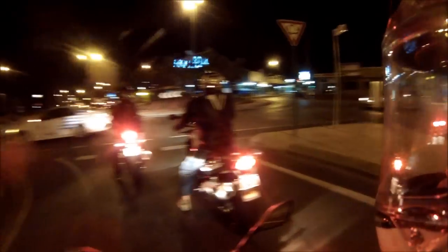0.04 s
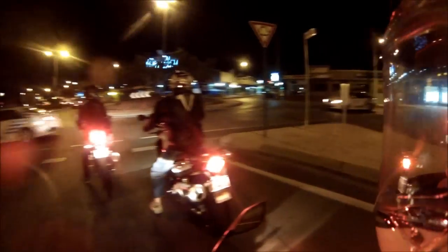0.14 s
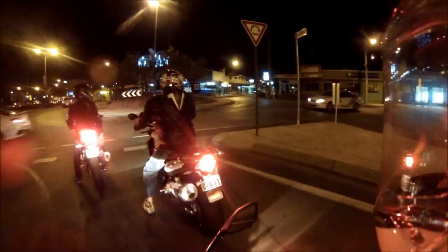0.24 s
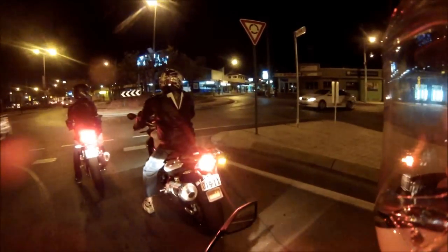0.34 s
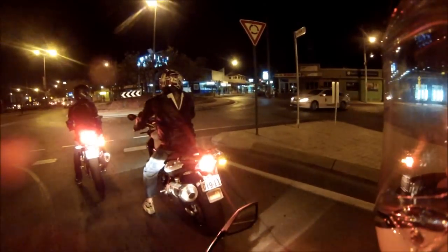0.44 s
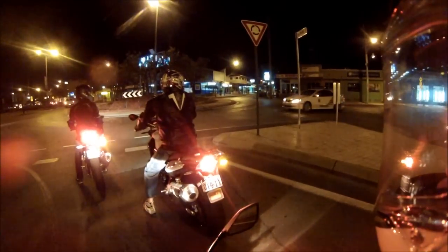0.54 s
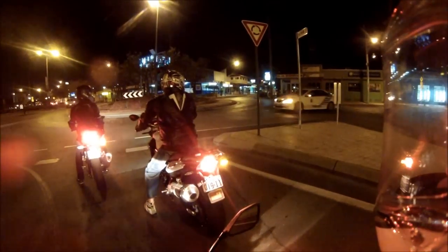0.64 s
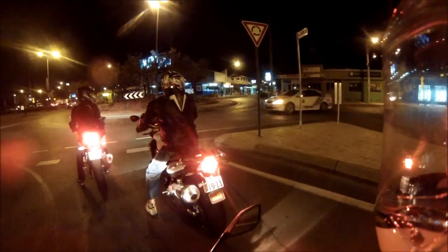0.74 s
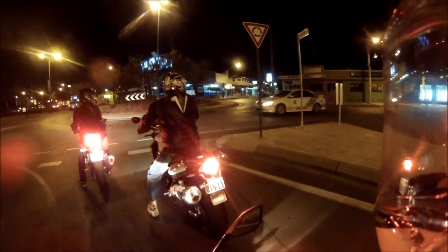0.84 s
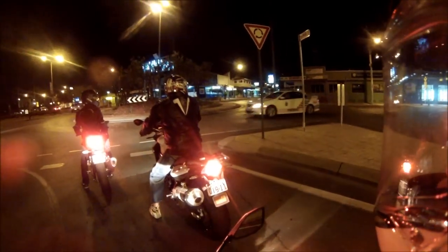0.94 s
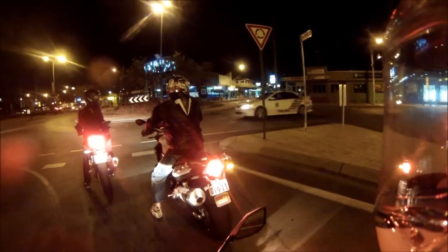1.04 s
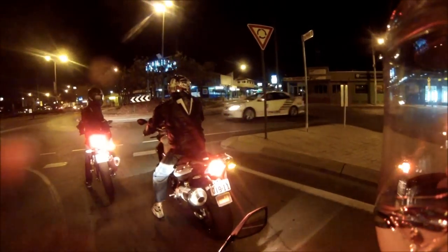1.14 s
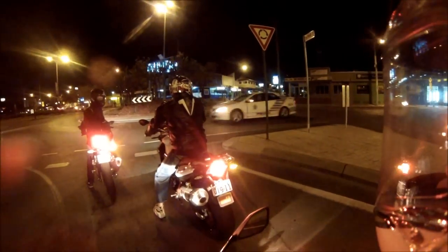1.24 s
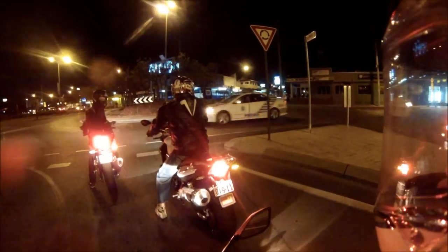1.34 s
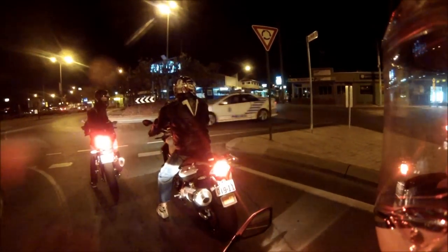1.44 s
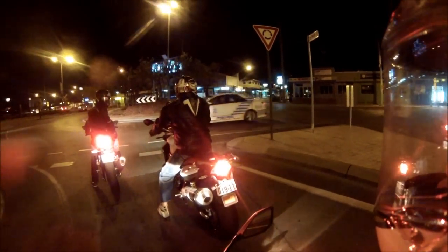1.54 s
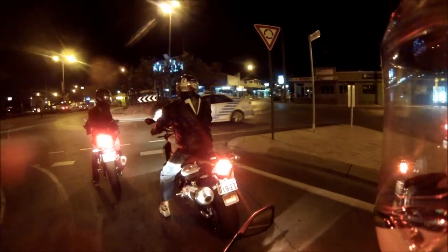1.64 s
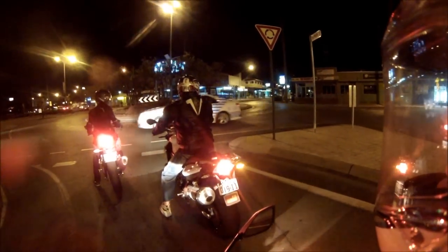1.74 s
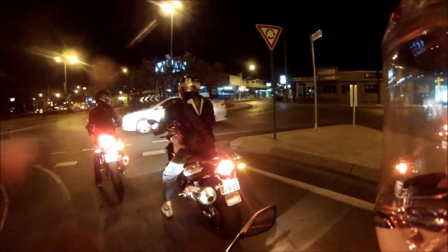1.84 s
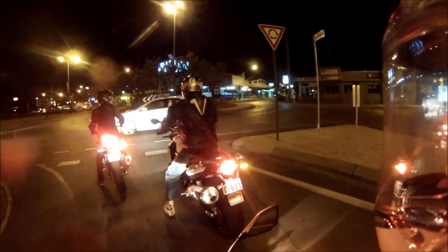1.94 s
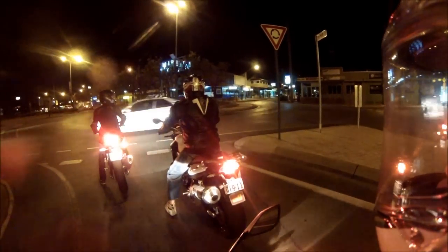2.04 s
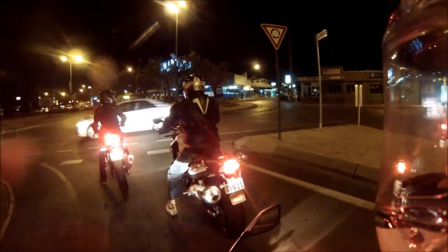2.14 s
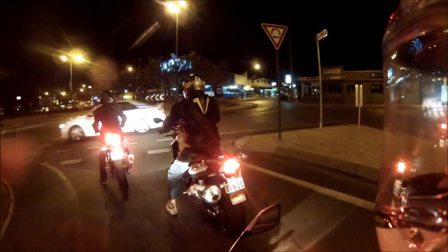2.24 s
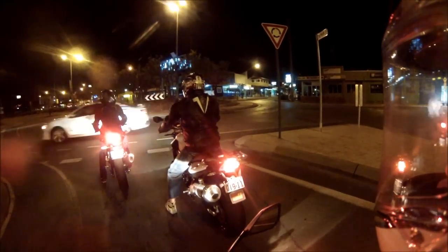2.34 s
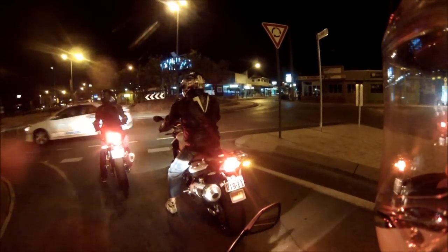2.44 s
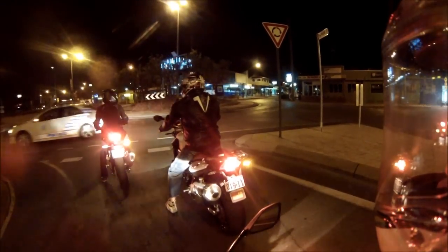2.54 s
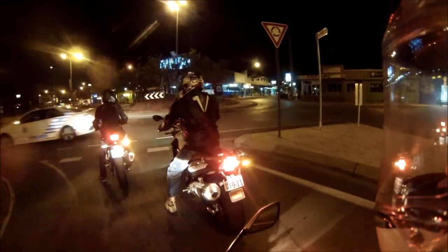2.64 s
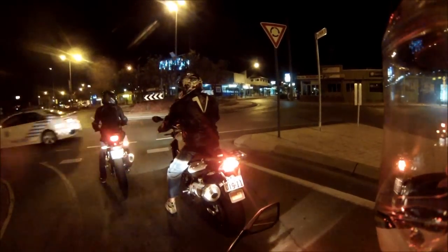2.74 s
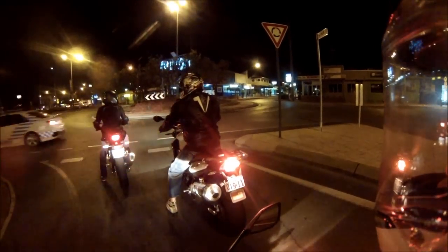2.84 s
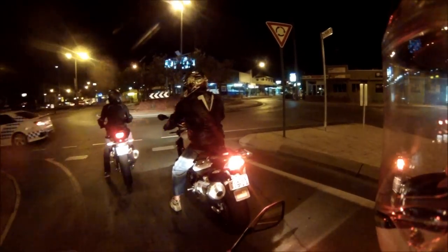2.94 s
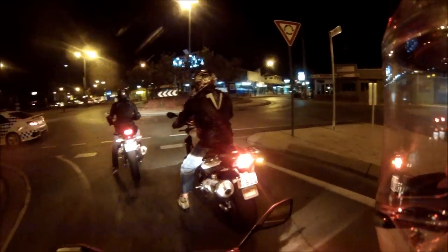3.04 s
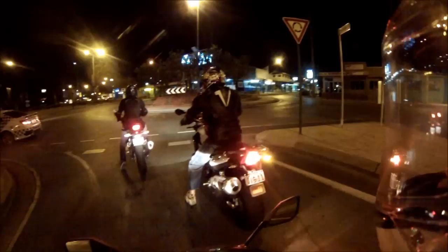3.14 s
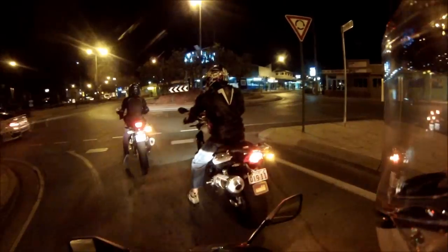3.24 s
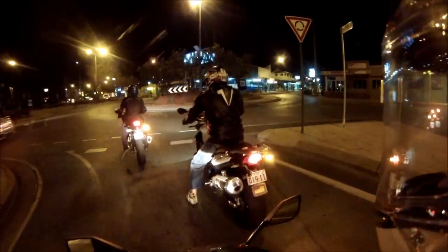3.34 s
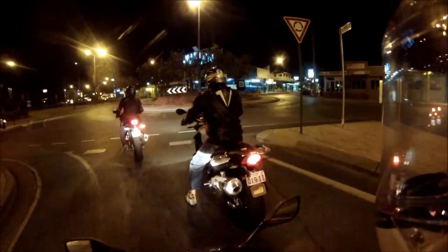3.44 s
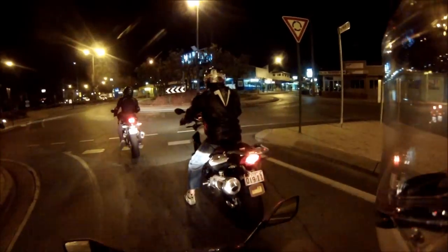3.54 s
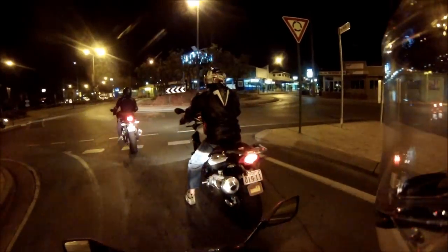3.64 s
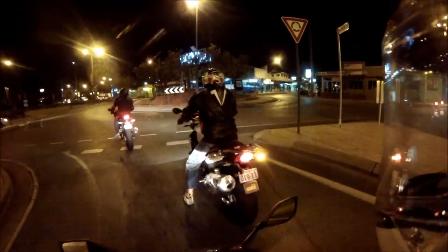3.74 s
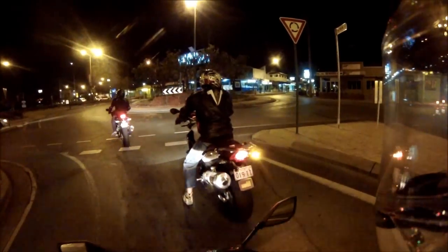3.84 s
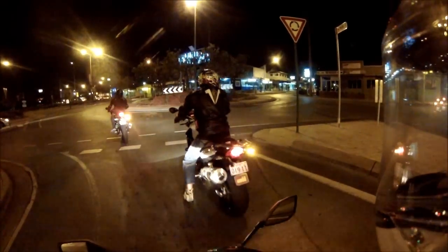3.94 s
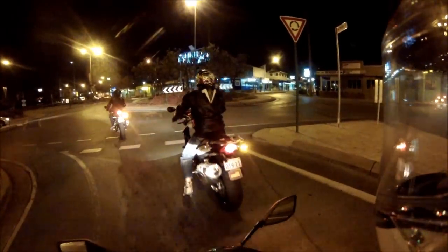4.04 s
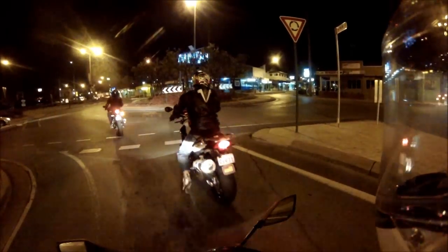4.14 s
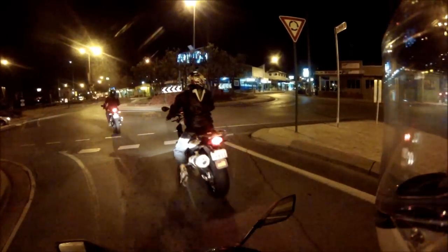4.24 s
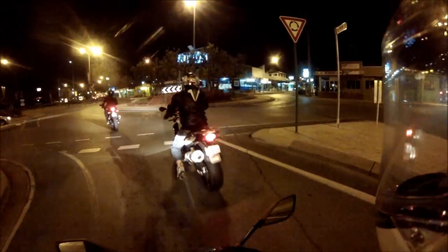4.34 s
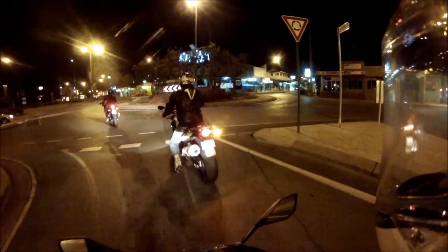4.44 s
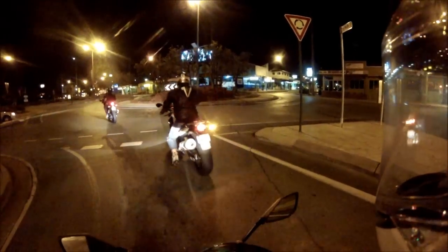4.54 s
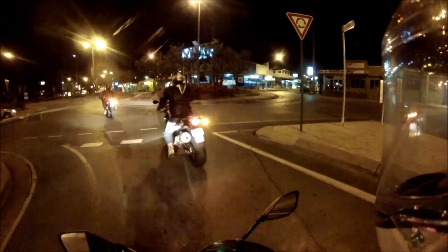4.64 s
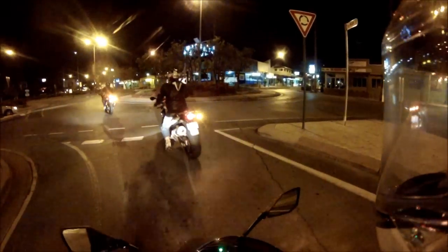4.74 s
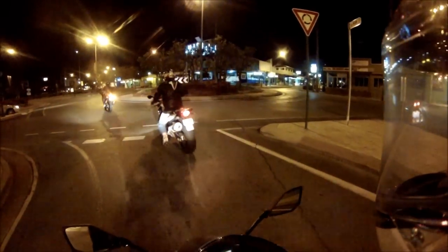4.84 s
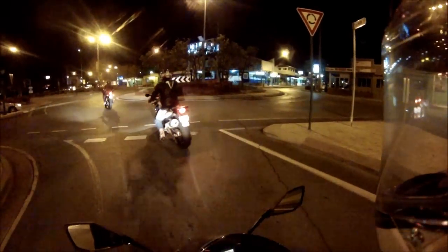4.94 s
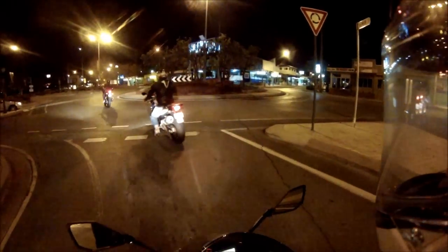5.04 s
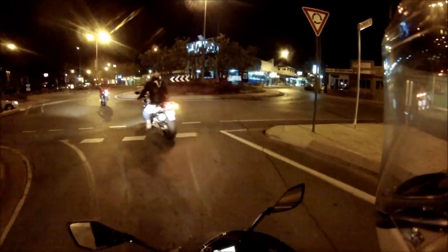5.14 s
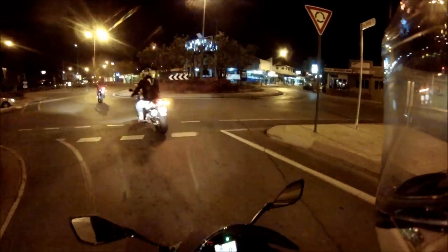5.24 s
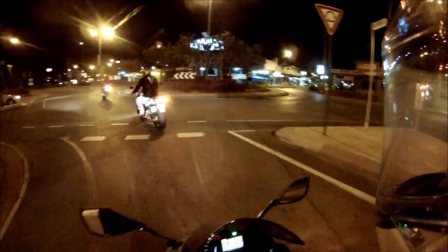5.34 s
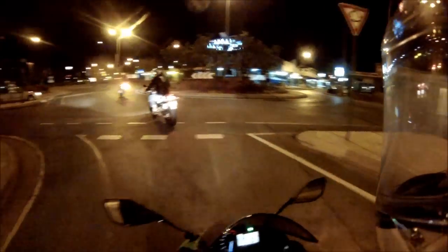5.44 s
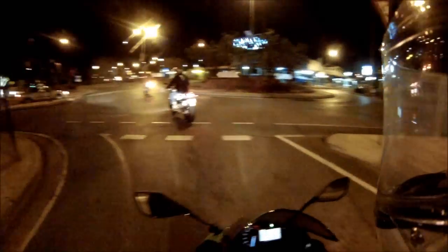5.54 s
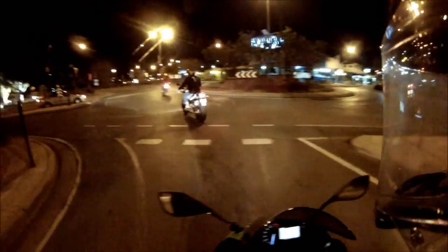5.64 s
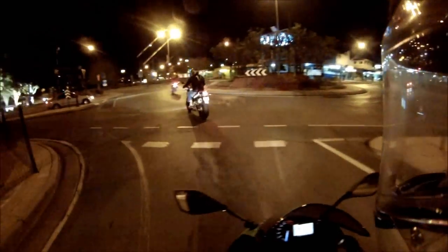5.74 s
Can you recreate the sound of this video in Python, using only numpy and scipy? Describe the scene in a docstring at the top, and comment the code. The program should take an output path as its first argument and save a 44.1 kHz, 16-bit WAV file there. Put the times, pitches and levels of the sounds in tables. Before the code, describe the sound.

A motorcycle thuds at idle right below the microphone, while a four-cylinder bike a few metres ahead idles with quick, dry squeaks. About halfway through, the squeaking stops and the bike ahead revs and leaves with a rasping exhaust. A second later the near bike pulls away, exhaust barking and gears whining. Wind rumbles on the microphone over the faint hush of night streets, with a few light knocks.

```python
"""A roundabout at night, the microphone at the rider's seat of the rearmost waiting motorcycle.
At first its engine thuds at idle, over distant streets and air rumbling on the microphone, while a
four-cylinder bike some three metres ahead squeaks once a cycle. Near 3 s that bike revs, and at 3.5 s
it leaves, its exhaust rasping as it draws away. About a second later a faint whine passes up the
road and the near bike pulls away, its exhaust barking and its gears whining under load."""
import sys
import numpy as np
from scipy import signal
from scipy.fft import rfft, irfft
from scipy.io import wavfile
from scipy.ndimage import uniform_filter1d

SR = 44100
rng = np.random.default_rng(int(sys.argv[2]) if len(sys.argv) > 2 else 0)


def int16_out(signal):
    """Quantize to a 16-bit WAV file."""
    q = np.round(np.clip(np.atleast_2d(signal).T, -1, 1) * 32767)
    wavfile.write(sys.argv[1], SR, q.astype(np.int16))


N = 254898
TIME = np.arange(N) / SR

# Distant streets, and air on the microphone. Each row: frequency in Hz, relative level in dB.
STREET_SPECTRUM = [(50, 3.5), (300, 1), (500, -2), (800, -19.5), (3000, -31), (8000, -35), (12000, -30),
                   (15000, -63)]
WIND_SPECTRUM = [(10, -23), (24, -17), (34, -1), (50, -5.5), (65, -7), (95, -9.5), (125, -18), (200, -13.5),
                 (400, -39), (1000, -67.5)]
# Gusts. Each row: centre in seconds, dB over the calm, half length in seconds.
GUSTS = [(0.123, 4, 0.19), (3.9, 3.5, 1), (5.597, 6, 0.085)]
# Light metal knocks; soft bumps on the mount. Each row: start in seconds, dB before trim, pitch in Hz.
METAL_KNOCKS = [(0.5352, -52, 1840), (3.0043, -47, 1880), (3.0834, -47.5, 1850), (3.5088, -47, 1900)]
MOUNT_BUMPS = [(.055, -28, 44.5), (2.89, -35, 100), (5.27, -23.5, 57.45)]

# The bike ahead idles, revs, then pulls steadily. Each row: time in seconds, firing rate in Hz.
AHEAD_FIRING_RATE = [(0, 41.68), (1.3, 40.43), (1.7, 40.98), (1.95, 38.85), (2.85, 41.1), (3.0, 45.65),
                     (3.35, 46.44), (3.52, 49.5), (3.61, 52.8), (3.7, 54.32), (3.84, 52.7), (4.08, 48.27),
                     (4.37, 43.25), (4.95, 47.46), (5.78, 44.14)]
# Its throttle. Each row: time in seconds, opening from 0 to 1.
AHEAD_THROTTLE = [(2.5, 0), (2.98, 0.46), (3.3, 0.49), (3.5, 0.88), (3.7, 0.96), (4.0, .95), (4.4, 0.94),
                  (4.9, .97), (5.78, 0.85)]
# Its exhaust boom, pipe rasp and gas hiss. Each row: frequency in Hz, relative level in dB.
AHEAD_BOOM_SPECTRUM = [(25, -20), (40, -5), (52, 4), (85, 2), (115, -15.5), (160, -36), (270, -22),
                       (900, -60)]
AHEAD_RASP_SPECTRUM = [(70, -14), (110, -7), (152, 14.5), (210, -7), (330, -8.5), (420, 0), (490, 4.5),
                       (545, -2), (625, -11), (730, -6), (900, -23), (1250, -10.5), (1900, -16),
                       (4000, -45.5)]
AHEAD_HISS_SPECTRUM = [(500, -8.5), (950, -9.5), (1400, 3.5), (2000, -1.5), (2800, -7.5), (3600, -2),
                       (4250, -12.5), (4800, -3.5), (5800, -12.5), (6700, -8), (7600, -12), (9300, -19),
                       (12000, -23.5), (15000, -30)]
# Its loudest squeaks, on or between the beats. Each row: time in seconds, level in dB before trim.
LOUD_SQUEAKS = [(0.1484, -43), (0.2466, -44.5), (.5357, -44), (.6341, -43.5), (1.0255, -42.5),
                (1.2217, -44.5), (1.3217, -44), (1.4192, -45.5), (1.8103, -47), (1.8618, -48),
                (2.067, -42.5), (2.218, -44.5), (2.2674, -43), (2.321, -45), (2.4184, -44), (2.814, -45),
                (2.9102, -44.5)]
# Gear tones. Each row: firing-rate multiple (sounded at the nearest half), smear in Hz, relative dB.
AHEAD_GEARS = [(34.7, 35, -2), (37.15, 35, -2.5), (36.05, 150, -6.5)]
NEAR_GEARS = [(10.5, 16, -15), (20, 40, -6), (21, 60, -11.5), (20, 220, -6.5), (30, 27, -23),
              (38.9, 200, -16), (59.3, 240, -17)]

# The near bike idles, blips, then pulls away. Each row: time in seconds, firing rate in Hz.
NEAR_FIRING_RATE = [(0, 35.57), (.8, 35.18), (2, 35.67), (3.45, 36.11), (3.68, 38.53), (4.28, 34.84),
                    (4.43, 43), (4.57, 63.8), (4.66, 73.65), (4.75, 75.9), (4.9, 70.44), (5.27, 63.8),
                    (5.38, 60.3), (5.78, 56.33)]
# Its rider's hands. Each row: time in seconds, throttle from 0 to 1, clutch from 0 to 1 (home).
NEAR_HANDS = [(2.9, 0, 0.4), (3.7, 0.15, 0.84), (4.3, 0, 0.74), (4.48, 0.58, 0.57), (4.58, 0.6, 0.95),
              (4.73, 1, 0.95), (4.95, 0.71, 0.98), (5.23, 0.7, 1), (5.38, 0.31, 0.98), (5.65, 0.82, 0.91)]
# Its exhaust body, throttle bark, and valve gear and cases. Each row: frequency in Hz, relative dB.
NEAR_BOOM_SPECTRUM = [(20, -24.5), (36, -9.5), (70, 5), (108, -1.5), (140, 0.5), (185, 5), (218, 4),
                      (250, -7), (285, -23), (400, -39), (900, -75)]
NEAR_BARK_SPECTRUM = [(150, -20), (270, -8), (292, -13), (322, 7), (346, 6), (380, -3.5), (415, 0.5),
                      (455, -1), (520, -15), (600, -14), (660, -25), (740, -25.5), (900, -33), (2000, -63)]
NEAR_CLATTER_SPECTRUM = [(400, -3.5), (700, -16), (980, -7), (1200, -2.5), (1450, 4.5), (1750, -3),
                         (2100, -1.5), (2850, -12.5), (3600, -8), (4250, -19), (4750, -12.5), (5800, -23),
                         (7200, -24), (14000, -29)]

# Resonances of the camera housing. Each row: frequency in Hz, width in Hz, dB over the direct sound.
HOUSING_MODES = [(1151, 7.2, 0.5), (1858, 29, -5), (2170, 17, -16), (2514, 83, -5), (3287, 92, -4.5),
                 (3800, 42, -1), (4684, 88, -12.5), (6550, 100, -11), (7480, 140, -3.5)]

AHEAD_IDLE_HZ, NEAR_IDLE_HZ = 41.5, 34.9  # firing rates


def undb(db):
    """Decibels to gain."""
    return 10 ** (np.asarray(db) / 20)


def curves(rows):
    """The columns of a table, joined by straight lines in time."""
    times, *columns = np.transpose(rows)
    return [np.interp(TIME, times, column) for column in columns]


def unit(x):
    """Scale to rms 1."""
    return x / np.sqrt(np.mean(x ** 2))


def noise():
    """White noise."""
    return rng.standard_normal(N)


def walk(rate_hz):
    """Random levels, each gliding into the next in 1 / rate_hz seconds; rms 1."""
    hold = max(int(SR / rate_hz), 1)
    steps = np.repeat(rng.standard_normal(N // hold + 1), hold)
    return unit(uniform_filter1d(steps, hold)[:N])


def hump(centre_s, half_s):
    """A smooth rise to 1 and fall again."""
    return np.exp(-((TIME - centre_s) / half_s) ** 2)


def colour(x, spectrum, size=16384):
    """Ring x through a minimum-phase body with the given spectrum; rms 1."""
    hz, db = np.transpose(spectrum)
    grid_hz = np.maximum(np.arange(size // 2 + 1) * SR / size, 1)
    gain = undb(np.interp(np.log(grid_hz), np.log(hz), db))
    cepstrum = irfft(np.log(gain))
    cepstrum[1:size // 2] *= 2
    cepstrum[size // 2 + 1:] = 0
    impulse_response = irfft(np.exp(rfft(cepstrum)))
    return unit(signal.fftconvolve(x, impulse_response)[:N])


def distant_streets(level_db=-57, swell_db=1):
    """The hush of the town beyond the roundabout, wavering slightly."""
    return colour(noise(), STREET_SPECTRUM) * undb(level_db + swell_db * walk(4.2))


def far_whine(loudest_s=4.58, pitch_hz=2245, glide_hz_per_s=330, level_db=-57.5):
    """A faint rising whine further up the road, likely the first bike to leave."""
    hz = pitch_hz + glide_hz_per_s * (TIME - loudest_s)
    tone = smeared_tone(np.cumsum(hz) / SR, smear_hz=230.5)
    return tone * undb(level_db) * hump(loudest_s, half_s=0.18)


def wind_on_microphone(calm_db=-45.5):
    """Air rumbles right on the microphone and swells with each gust."""
    gust_db = sum(db * hump(centre_s, half_s) for centre_s, db, half_s in GUSTS)
    return colour(noise(), WIND_SPECTRUM) * undb(calm_db + gust_db)


def knocks(rows, rise_s, trim_db):
    """Each blow swells to its peak in rise_s and rings out at one pitch."""
    out = np.zeros(N)
    for start_s, db, hz in rows:
        age = np.maximum(TIME - start_s, 0)
        envelope = age / rise_s * np.exp(1 - age / rise_s)
        out += undb(db + trim_db) * envelope * np.sin(2 * np.pi * hz * age)
    return out


def firing_count(hz):
    """Running count of firings, starting partway between two."""
    return np.cumsum(hz) / SR + 0.39


def firings(hz, scatter_db, jitter_s, limp_db):
    """One pulse a firing, uneven in size and time, alternately strong and weak; rms 1."""
    count = firing_count(hz)
    number = np.arange(1, int(count[-1]) + 1)
    lateness, strength = rng.standard_normal((len(number), 2)).T
    times = np.interp(number, count, TIME) + jitter_s * lateness
    position = np.clip(times * SR, 0, N - 2)
    i = position.astype(int)
    fraction = position - i
    size = undb(scatter_db * strength + limp_db * (-1) ** number)
    size /= np.sqrt(hz[i])  # equal power at any speed
    pulses = np.bincount(i, size * (1 - fraction), N) + np.bincount(i + 1, size * fraction, N)
    return unit(signal.sosfilt(signal.butter(2, 12, "high", fs=SR, output="sos"), pulses))


def puffs(hz, depth, decay):
    """Noise that swells at each firing; decay is a share of the gap to the next."""
    return unit(noise() * (1 + depth * np.exp(-(firing_count(hz) % 1) / decay)))


def pipe_echoes(x, trip_s, echo):
    """All-pass reflections in a pipe: they spread a pulse in time and keep its colour."""
    hz = np.arange(N + 1) * SR / (2 * N)
    delay = np.exp(-2j * np.pi * hz * trip_s)
    return irfft(rfft(x, 2 * N) * (echo - delay) / (1 - echo * delay))[:N]


def smeared_tone(cycles, smear_hz):
    """A tone of rms 1 whose phase wanders freely and whose strength wavers less."""
    wander = walk(smear_hz) + 1j * walk(smear_hz)
    wander /= np.sqrt(np.abs(wander) + 1e-9)
    return unit(np.real(wander * np.exp(2j * np.pi * cycles)))


def gear_whine(hz, gears):
    """Gear mesh tones locked to the crank, each smeared by backlash."""
    return sum(undb(db) * smeared_tone(round(2 * multiple) / 2 * firing_count(hz), smear_hz)
               for multiple, smear_hz, db in gears)


def load_gain(throttle, speed, idle_db, throttle_db, doubling_db):
    """An engine layer grows from idle with the throttle and with each doubling of speed (1 = idle)."""
    return undb(idle_db + throttle_db * throttle + doubling_db * np.log2(speed))


def squeak_beats(hz, first_firing=2.61, soft_db=-48, spread_db=2.5, end_s=2.96):
    """Times and levels: the loud squeaks, and softer ones on the free beats, four firings apart."""
    count = firing_count(hz)
    beats = np.interp(np.arange(first_firing, count[-1], 4), count, TIME)
    beat_db = soft_db + spread_db * rng.standard_normal(len(beats))
    beat_db -= 7 * ((1.66 < beats) & (beats < 2.17))  # weaker while the idle sags
    gap_to_loud_s = np.abs(beats[:, None] - np.array(LOUD_SQUEAKS)[:, 0]).min(axis=1)
    soft = (gap_to_loud_s > 1 / AHEAD_IDLE_HZ) & (beats < end_s)
    return list(LOUD_SQUEAKS) + list(zip(beats[soft], beat_db[soft]))


def squeaks(firing_hz, pitch_hz=3361, length_s=0.0084, lead_s=0.00101, overtone_db=-12, trim_db=-2):
    """A dry part rubs once a cycle: a few milliseconds of tone, with a falling overtone at its start."""
    out = np.zeros(N)
    age = np.arange(int(length_s * SR)) / SR
    progress = age / length_s
    swell = np.sin(np.pi * progress ** 0.55) ** 1.3
    overtone_swell = undb(overtone_db) * np.sqrt(swell) * (1 - progress) ** 2
    for time_s, db in squeak_beats(firing_hz):
        hz = pitch_hz + 15 * rng.standard_normal()
        tone = swell * np.sin(2 * np.pi * hz * age + rng.uniform(0, 2 * np.pi))
        overtone_hz = 2 * hz * (1.07 - 0.3 * progress)
        overtone = overtone_swell * np.sin(2 * np.pi * np.cumsum(overtone_hz) / SR)
        start = int(max(time_s - lead_s, 0) * SR)
        out[start:start + len(age)] += undb(db + trim_db) * (tone + overtone)
    return out


def open_exhaust(hz, throttle):
    """A four-cylinder's firings boom in an open pipe, rasp in its higher resonances and puff out gas."""
    speed = hz / AHEAD_IDLE_HZ
    pulses = firings(hz, scatter_db=0.8, jitter_s=0.00004, limp_db=-1)
    boom = colour(pulses, AHEAD_BOOM_SPECTRUM)
    boom *= load_gain(throttle, speed, idle_db=-60, throttle_db=16.3, doubling_db=3)
    cracks = pipe_echoes(pulses, trip_s=0.0037, echo=0.55)
    cracks = pipe_echoes(cracks, trip_s=0.001442, echo=0.66)
    rasp = colour(cracks + 0.17 * puffs(hz, depth=2, decay=0.3), AHEAD_RASP_SPECTRUM)
    rasp *= load_gain(throttle, speed, idle_db=-72.5, throttle_db=29.1, doubling_db=3)
    hiss = colour(puffs(hz, depth=0.37, decay=0.15) * undb(0.81 * walk(50)), AHEAD_HISS_SPECTRUM)
    hiss *= load_gain(throttle, speed, idle_db=-64, throttle_db=10.75, doubling_db=5.8)
    return boom + rasp + hiss


def bike_ahead(waiting_m=3.34, leaves_s=3.53, accel_m_s2=1.63, clutch_bite_s=3.68):
    """Exhaust, gears and squeaks a few metres ahead of the microphone, fading as the bike rides off."""
    hz, = curves(AHEAD_FIRING_RATE)
    throttle, = curves(AHEAD_THROTTLE)
    exhaust = open_exhaust(hz, throttle)
    since_bite_s = TIME - clutch_bite_s
    whine_db = -55 + np.minimum(70 * since_bite_s, -11.5 * since_bite_s)  # quick rise, slow fall
    gears = gear_whine(hz, AHEAD_GEARS) * undb(whine_db)
    distance_m = waiting_m + 0.5 * accel_m_s2 * np.maximum(TIME - leaves_s, 0) ** 2
    return (exhaust + gears + squeaks(hz)) * waiting_m / distance_m


def hunting(rate_hz=5, depth=0.0303):
    """Hz by which an engine strays as it runs ahead and falls back."""
    lead_firings = depth * uniform_filter1d(walk(rate_hz), int(SR / rate_hz / 2))
    return np.gradient(lead_firings) * SR


def near_bike(free_gears_db=-78.5, clutch_home_db=28):
    """Firings thud below the microphone; throttle and speed add bark, the clutch loads the gears."""
    hz = curves(NEAR_FIRING_RATE)[0] + hunting()
    throttle, clutch = curves(NEAR_HANDS)
    speed = hz / NEAR_IDLE_HZ
    pulses = firings(hz, scatter_db=0.53, jitter_s=0.00007, limp_db=-0.1)
    # combustion is ragged at idle and evens out as the engine speeds up
    boom = colour(pulses + 0.1 / speed * puffs(hz, depth=1, decay=0.3), NEAR_BOOM_SPECTRUM)
    boom *= load_gain(throttle, speed, idle_db=-41, throttle_db=8.7, doubling_db=0.96)
    ragged_pulses = pulses + 0.22 / speed * puffs(hz, depth=0.7, decay=0.4)
    bark = colour(pipe_echoes(ragged_pulses, trip_s=0.00303, echo=0.6), NEAR_BARK_SPECTRUM)
    bark *= load_gain(throttle, speed, idle_db=-61.5, throttle_db=2.49, doubling_db=20.25)
    clatter = colour(puffs(hz, depth=0.31, decay=0.33) * undb(0.97 * walk(90)), NEAR_CLATTER_SPECTRUM)
    clatter *= load_gain(throttle, speed, idle_db=-55.5, throttle_db=0.5, doubling_db=1.2)
    gears = gear_whine(hz, NEAR_GEARS) * undb(free_gears_db + clutch_home_db * clutch)
    return boom + bark + clatter + gears


def scene():
    """The bikes, their knocks and the night air as they reach the rider's seat, in mono."""
    bikes = near_bike() + bike_ahead() + far_whine()
    metal = knocks(METAL_KNOCKS, rise_s=0.0031, trim_db=0)
    bumps = knocks(MOUNT_BUMPS, rise_s=0.025, trim_db=-5)
    return (bikes + metal + bumps + wind_on_microphone() + distant_streets())[None]


def record(dry, top_hz=15100, fade_s=0.003):
    """The camera housing rings a little around the microphone; the top is cut steeply."""
    rings = sum(undb(db) * signal.lfilter(*signal.iirpeak(hz, hz / width_hz, fs=SR), dry)
                for hz, width_hz, db in HOUSING_MODES)
    fades = np.minimum(np.minimum(TIME, TIME[::-1]) / fade_s, 1)
    lowpass = signal.ellip(10, 0.2, 70, top_hz, fs=SR, output="sos")
    return signal.sosfilt(lowpass, (dry + rings) * fades)


dry = scene()
out = record(dry)
int16_out(out)
```